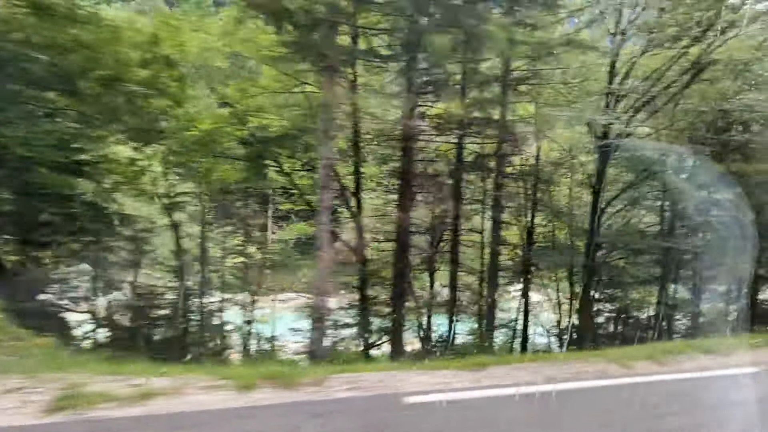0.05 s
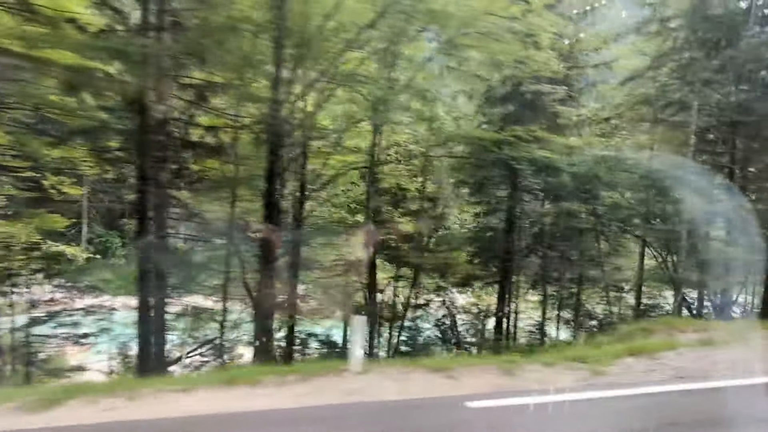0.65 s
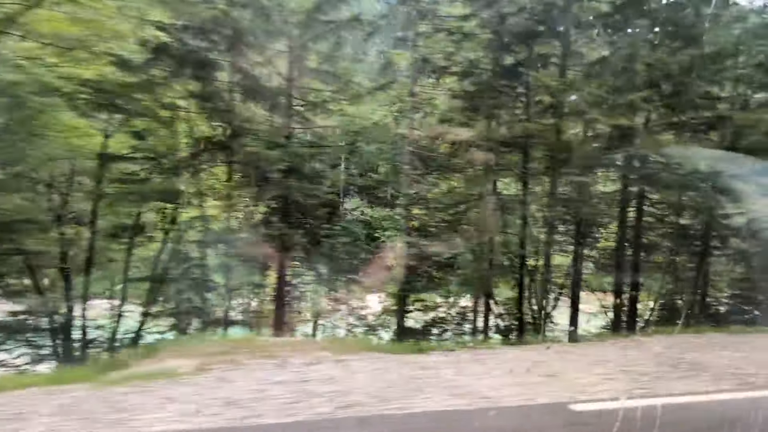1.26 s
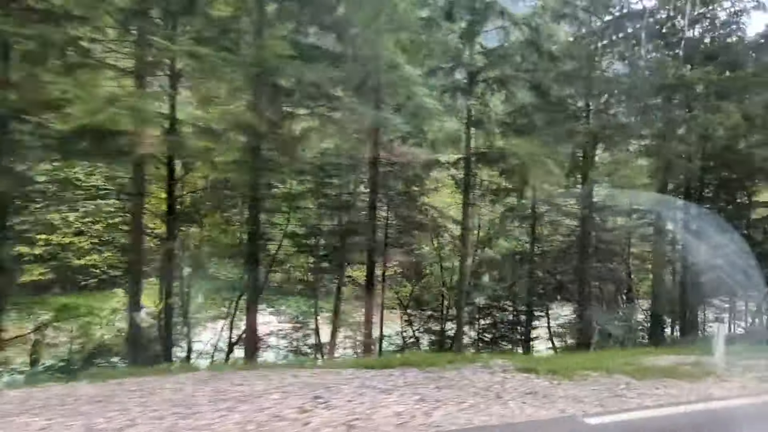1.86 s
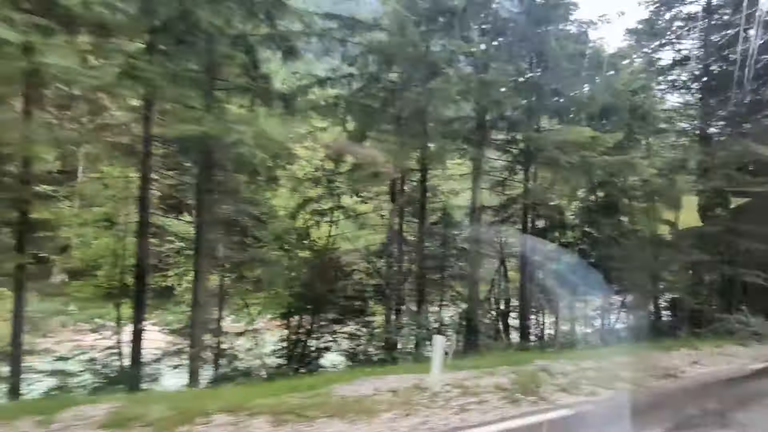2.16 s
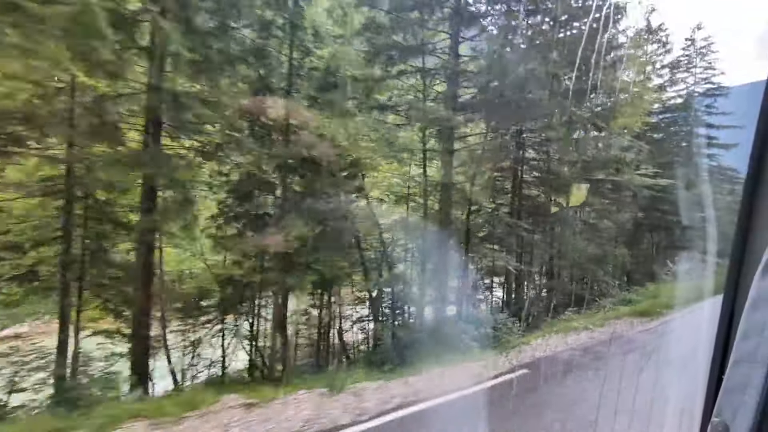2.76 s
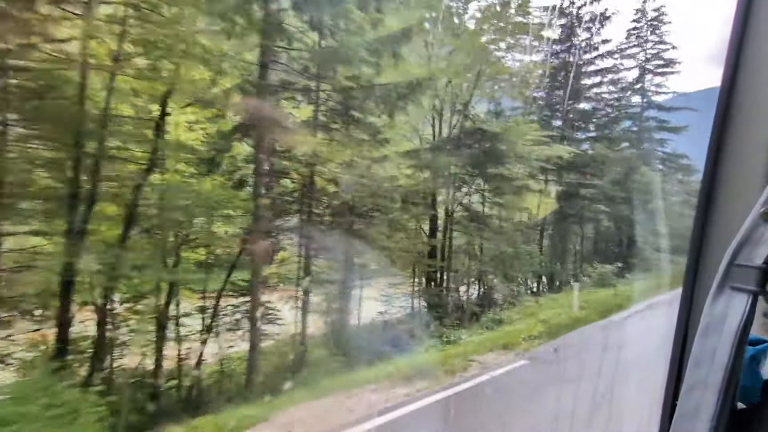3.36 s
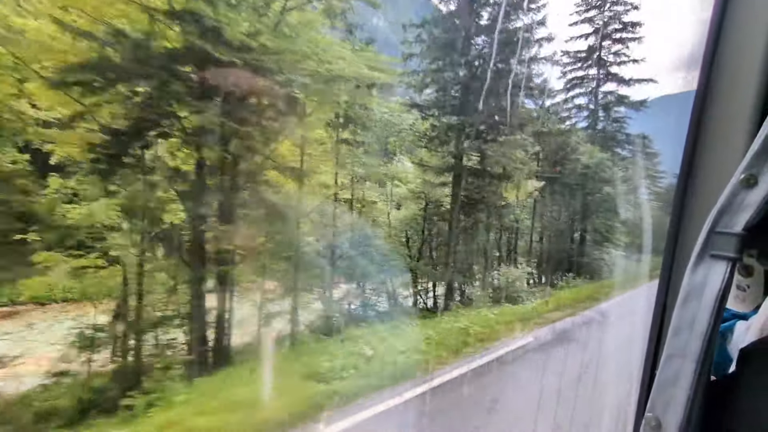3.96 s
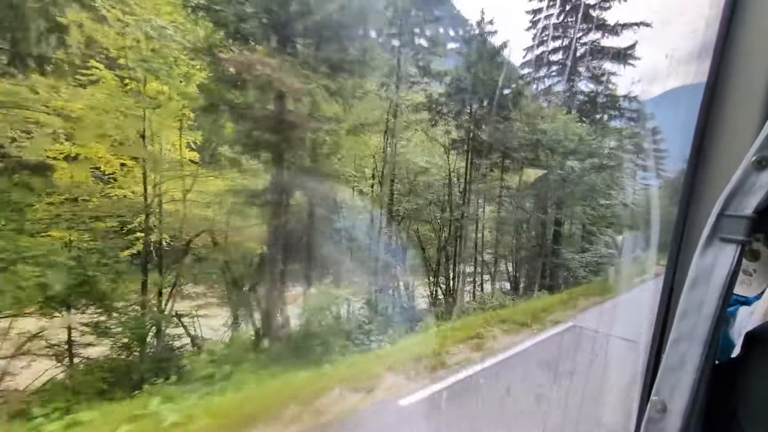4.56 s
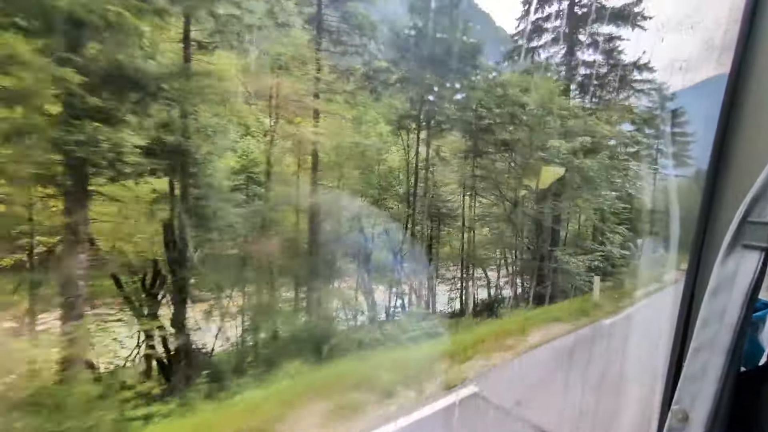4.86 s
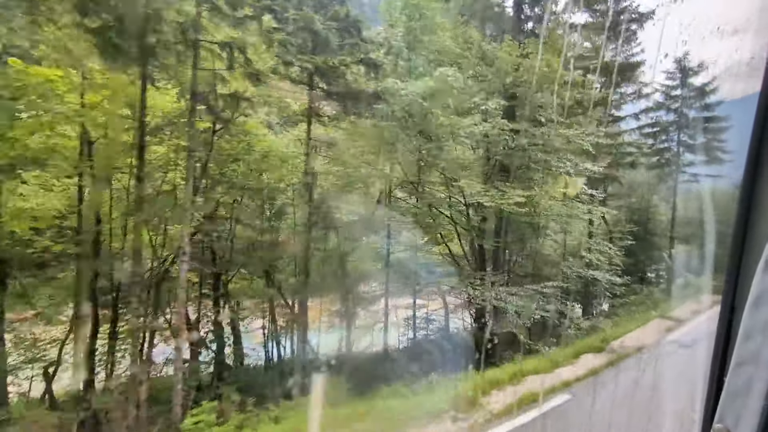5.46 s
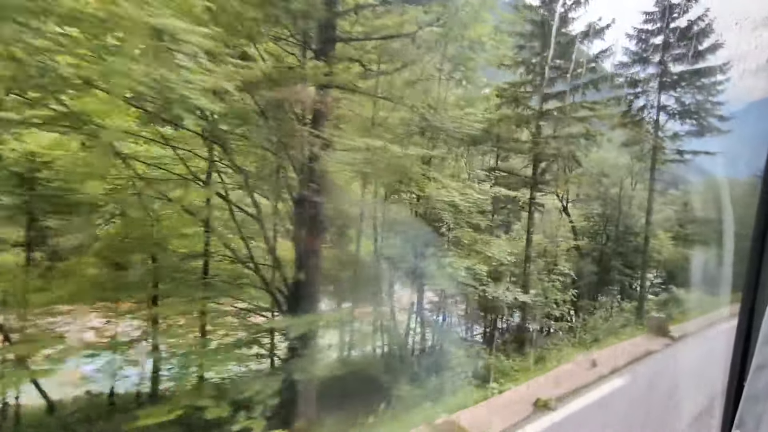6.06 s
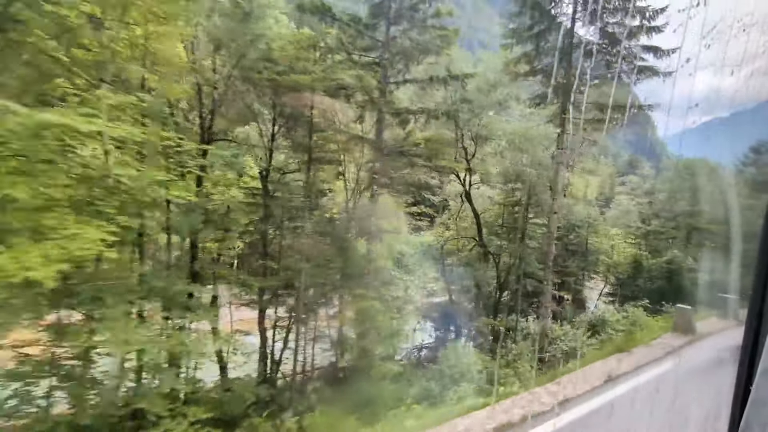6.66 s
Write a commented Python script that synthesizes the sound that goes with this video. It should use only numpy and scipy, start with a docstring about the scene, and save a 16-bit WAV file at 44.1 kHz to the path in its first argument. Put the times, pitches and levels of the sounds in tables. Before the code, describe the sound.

A moving bus rumbles from inside, with engine drone, faint gear whine, soft bumps, fabric rustling and a few trim clacks.

```python
"""Bus on a valley road, window seat

Tyres shake the cabin into a deep rumble. The diesel drones and its gears whine, sagging near the end.
Ventilation hums and hisses; fabric rustles close by. Bumps ring the cabin air, loose trim clacks,
and three faint hoots sound. The tones shift in balance as the microphones turn from window to front."""
import sys
import numpy as np
from scipy import signal
from scipy.fft import rfft, irfft
from scipy.io import wavfile
from scipy.ndimage import uniform_filter1d

SR = 44100
rng = np.random.default_rng(int(sys.argv[2]) if len(sys.argv) > 2 else 0)


def log_audio(samples):
    """Write samples as a 16-bit WAV file to the path given in sys.argv[1]."""
    # one column per channel
    frames = np.atleast_2d(samples).T
    # limit to full scale, then quantise
    limited = np.clip(frames, -1, 1)
    pcm = np.round(limited * 32767).astype(np.int16)
    wavfile.write(sys.argv[1], SR, pcm)


N = 296352
TIME, FREQ = np.arange(N) / SR, np.arange(N // 2 + 1) * SR / N

# noise spectra (frequency [Hz], relative density [dB])
HEAVE_SPECTRUM = [(15, -50), (24, -44), (33, -31), (39, 1), (44, 5), (52, 8.5), (64, -43), (120, -75)]
BOOM_SPECTRUM = [(25, -68), (42, -48), (54, 1), (63, 1.5), (78, 5.5), (94, -4.5), (110, -1.5), (135, -8.5),
                 (180, -17.5), (250, -26.5), (500, -65), (3000, -100)]
TYRE_SPECTRUM = [(30, -43), (80, -17), (200, 13.5), (300, 5.5), (390, 4), (500, 4), (700, -1.5), (820, -3),
                 (950, -6.5), (1250, -7), (1700, -13.5), (2500, -24), (4000, -31.5), (9000, -62)]
AIR_SPECTRUM = [(300, -6), (1500, 11), (2800, 3.5), (4700, -0.5), (6500, -3), (7700, -6), (8600, -34),
                (12000, -15), (15500, -39)]
SLOW_RUB_SPECTRUM = [(700, -19), (2000, 15.5), (3000, 6.5), (4500, 11), (7500, 7), (9000, 0), (11500, 4.5),
                     (13000, -1.5), (15500, -3)]
QUICK_RUB_SPECTRUM = [(1000, -1), (3500, 3), (7000, 2.5), (9000, -3.5), (11500, 0), (14000, -12),
                      (15500, -19)]
CLACK_SPECTRUM = [(300, -50), (800, -22), (1050, -5.5), (1400, 2), (1900, -1.5), (2800, -4), (4500, -6),
                  (6000, -9), (9000, -14.5), (13000, -17), (15500, -30)]
# stereo width (frequency [Hz], side minus mid [dB])
WIDTH = [(60, -50), (110, -13.5), (200, -12), (380, -9), (700, 3.5), (1290, 1.5), (2380, -0.5), (15000, 0)]
# stereo balance (frequency [Hz], left minus right [dB])
BALANCE = [(60, -2), (200, -1), (700, 1), (1290, -3.5), (2380, 0), (4400, -2), (8000, -3), (15000, -1.5)]
# glass, ceiling and seat echoes (left delay [s], right delay [s], gain)
REFLECTIONS = [(.0021, 0.0035, 0.34), (.0057, 0.0045, 0.24), (.0094, 0.0067, 0.22), (0.0151, 0.018, .22),
               (0.025, 0.014, .18)]
# cabin boom from road roughness (time [s], level [dB])
BOOM_LEVEL = [(0, -15), (.2, -15), (.72, -15), (.92, -19), (1.3, -17), (1.65, -22), (2.3, -20),
              (2.7, -18.5), (3.1, -22), (4.1, -22.5), (4.9, -21.5), (5.4, -18), (5.9, -23.5), (6.4, -22.5),
              (6.72, -21.5)]
# tyre roar (time [s], level [dB])
ROAR_LEVEL = [(0, -31), (.6, -33), (1.1, -32), (2, -31), (3, -32), (4, -30.5), (4.9, -32), (5.45, -28),
              (5.8, -30), (6.2, -31.5), (6.72, -32.5)]
# road dips (centre [s], heave level [dB], half length [s])
DIPS = [(.57, -28, 0.094), (.88, -32, 0.043), (1.543, -22, 0.05), (2.931, -22, 0.058), (3.477, -26, 0.088),
        (3.92, -27, 0.05), (5.15, -23, 0.053), (5.475, -17, 0.11), (5.793, -21.5, 0.062),
        (6.113, -25, 0.059), (6.556, -25.5, 0.049)]
# crankshaft (time [s], speed [rev/s])
SHAFT_SPEED = [(0, 19.0), (.6, 18.92), (1.2, 18.93), (1.8, 18.81), (2.4, 18.78), (3, 18.82), (3.5, 18.75),
               (4.1, 18.82), (4.6, 18.72), (5.1, 18.65), (5.5, 18.41), (5.9, 18.2), (6.72, 18.09)]
# microphones turning through the cabin's standing waves (time [s], turn [0 window, 1 front])
TURN = [(0, 0.17), (1.8, 0), (2.4, 0.72), (6.72, 0.69)]
# engine lines (crankshaft order, rounded to halves in use; window level [dB], front level [dB])
ENGINE_ORDERS = [(3, -35, -34.5), (4, -34, -32.5), (6, -30.5, -27.5), (7.5, -35, -35.5), (9, -32.5, -47.5),
                 (12, -36.5, -34), (13.5, -54, -45), (16.5, -49, -45), (18, -47.5, -42.5), (20, -74, -34.5),
                 (27, -52, -40), (29, -51.5, -48.5), (32, -52, -58), (43, -62, -56), (48.14, -60, -57),
                 (73, -67.5, -60), (72, -67, -43.5)]
# gear whine under load (time [s], 24-tooth level [dB], 36-tooth level [dB])
MESH_LEVELS = [(0, -61, -53), (.7, -54, -67), (1.0, -37.5, -43), (1.75, -39.5, -48.5), (2.55, -33.5, -39),
               (3.1, -35.5, -42.5), (3.5, -37, -50.5), (3.8, -41.5, -39.5), (4.35, -39, -38),
               (5.15, -39.5, -42.5), (5.5, -43, -53), (5.8, -37.5, -47), (6.72, -30, -52)]
# blade tones (frequency [Hz], window level [dB], front level [dB])
BLOWER_LINES = [(296.5, -38.5, -48.5), (590.4, -41.5, -51), (809, -49.5, -52)]
# fabric strokes (peak [s], level [dB], half length [s])
STROKES = [(0.113, -52.5, 0.29), (0.269, -41, 0.05), (0.556, -46, 0.046), (0.765, -51, 0.053),
           (.89, -47, 0.09), (1.052, -45, 0.051), (1.198, -49.5, 0.093), (1.305, -45.5, 0.055),
           (1.623, -59, 0.11), (1.825, -49, 0.23), (2.094, -41.5, 0.038), (2.127, -46, 0.19),
           (2.462, -46, 0.13), (2.68, -54, 0.094), (2.83, -46, 0.063), (2.95, -47.5, 0.056),
           (3.09, -49, 0.18), (3.223, -50, 0.019), (3.286, -49.5, .008), (3.41, -50.5, 0.032),
           (3.533, -56, 0.067), (3.655, -52.5, 0.05), (4.004, -55.5, 0.27), (4.3, -44.5, 0.034),
           (4.38, -51, 0.074), (4.74, -52.5, 0.2), (5.002, -59, 0.12), (5.16, -50, 0.053),
           (5.33, -56, 0.06), (5.546, -55, 0.026), (6.234, -52, 0.33), (6.623, -46, 0.062)]
# dull scrape (peak [s], level [dB], half length [s], centre [Hz])
SCRAPE = (3.1, -50, .09, 2500)
# road bumps (time [s], level [dB], cabin ring [Hz])
JOLTS = [(0.163, -9.5, 74.6), (0.236, -3.5, 81.6), (0.566, -23, 60), (2.0, -12, 81.5), (2.753, -8.5, 71),
         (2.89, -17, 69.6), (3.7, -12, 69.7), (4.219, -13, 69.6), (4.491, -9.5, 72.5), (5.072, -5.5, 69),
         (5.329, -8, 75), (6.051, -12, 70.7), (6.421, -8, 74.7)]
# loose trim modes (frequency [Hz], width [Hz], gain [dB])
TRIM_MODES = [(1026, 92, 19), (1616, 36.6, 13), (1890, 28, 14.5), (2140, 36, -14), (3930, 73, -1.5),
              (4440, 64, 6), (5570, 19, 4)]
# trim impacts (time [s], level [dB], tilt [dB/octave], contact snap [Hz])
CLACKS = [(0.592, -26, 0, 4760), (0.5965, -16, 0.9, 4830), (0.603, -28.5, 6.5, 3000), (1.03, -30, -1, 4570),
          (2.207, -32, 3, 3670), (4.763, -42, 0.5, 4500), (4.8696, -23, 2, 3400), (5.321, -40.5, -2, 4510),
          (6.411, -35.5, 4, 3400)]
# hoots (peak [s], pitch [Hz], level [dB], half length [s])
HOOTS = [(1.208, 630, -32, 0.086), (1.574, 610, -40, 0.06), (2.348, 518, -38.5, 0.12)]


def undb(db):
    """Decibels to gain."""
    return 10 ** (np.asarray(db) / 20)


def curves(table):
    """Columns of a timed table, per sample."""
    s, *columns = np.transpose(table)
    return [np.interp(TIME, s, column) for column in columns]


def colour(points):
    """Gain per frequency bin from (Hz, dB) points."""
    hz, db = np.transpose(points)
    return undb(np.interp(np.log(FREQ + 1), np.log(hz), db))


def unit(x):
    """Divide by the root of the mean square."""
    return x / np.sqrt(np.mean(x ** 2))


def walk(rate_hz):
    """Random wander below rate_hz, rms 1."""
    return unit(irfft(rfft(rng.standard_normal(N)) / (1 + (FREQ / rate_hz) ** 4), N))


def swell(peak_s, half_s):
    """Gaussian rise and fall."""
    return np.exp(-((TIME - peak_s) / half_s) ** 2)


def decay(age_s, t60_s):
    """Exponential fall, 60 dB in t60_s."""
    return np.exp(-np.log(1000) * age_s / t60_s)


def resonance(hz, width_hz):
    """Response of one mode, gain 1 at centre."""
    return 1j * FREQ * width_hz / (hz ** 2 - FREQ ** 2 + 1j * FREQ * width_hz)


def cabin_noise(gain):
    """Diffuse stereo noise: bass alike on both sides, treble unrelated."""
    mid, side = rfft(rng.standard_normal((2, N)))
    side = side * colour(WIDTH)
    lean = np.sqrt(colour(BALANCE))
    return unit(irfft(gain * np.array([(mid + side) * lean, (mid - side) / lean]), N))


def steady_noise(spectrum, window_s):
    """Cabin noise with slow swells evened out."""
    noise = cabin_noise(colour(spectrum))
    power = uniform_filter1d(np.mean(noise ** 2, axis=0), int(window_s * SR))
    return noise / np.sqrt(power + 1e-6)


def near_noise(spectrum):
    """Cabin noise comb-filtered by close surfaces."""
    comb = 1 + sum(gain * np.exp(-2j * np.pi * np.outer([left_s, right_s], FREQ))
                   for left_s, right_s, gain in REFLECTIONS)
    return unit(irfft(rfft(cabin_noise(colour(spectrum))) * comb, N))


def tone(hz, waver_db, smear_rad, lead_s=0.00026):
    """A line wavering as the cabin sways; left channel leads."""
    phase = 2 * np.pi * np.cumsum(hz + np.zeros(N)) / SR + smear_rad * walk(6.9)
    pair = np.array([np.sin(phase + 2 * np.pi * hz * lead_s), np.sin(phase)])
    return unit(undb(waver_db * walk(2.4)) * pair)


def road(heave_re_boom_db=-21, heave_wander_db=5.5):
    """The surface booms in the cabin and roars under the tyres; the body heaves, most in dips."""
    boom_db, = curves(BOOM_LEVEL)
    roar_db, = curves(ROAR_LEVEL)
    sway = undb(boom_db + heave_re_boom_db + heave_wander_db * walk(5.1))
    dips = sum(undb(db) * swell(s, half_s) for s, db, half_s in DIPS)
    heave = (sway + dips) * steady_noise(HEAVE_SPECTRUM, window_s=0.085)
    boom = undb(boom_db) * steady_noise(BOOM_SPECTRUM, window_s=0.12)
    roar = undb(roar_db + 0.75 * walk(14.5)) * cabin_noise(colour(TYRE_SPECTRUM))
    return heave + boom + roar


def engine(shaft_hz, turn):
    """Diesel drone on whole and half orders; six cylinders fire on multiples of 3."""
    out = 0
    for order, window_db, front_db in ENGINE_ORDERS:
        line = tone(shaft_hz * np.round(2 * order) / 2, waver_db=2, smear_rad=0.33)
        out += undb(window_db + turn * (front_db - window_db)) * line
    return out


def driveline(shaft_hz, flutter_db=-12):
    """Two gear meshes whine, the lower throbbing; a belt-driven unit sings thinly above."""
    low_db, high_db = curves(MESH_LEVELS)
    low_hz, high_hz, belt_hz = 24 * shaft_hz, 36 * shaft_hz, 65.22 * shaft_hz
    beat_hz = 0.32 * shaft_hz
    mesh = tone(low_hz, waver_db=4.5, smear_rad=0.41)
    sideband = undb(-4) * tone(low_hz - beat_hz, waver_db=2.5, smear_rad=1.0)
    low = undb(low_db) * unit(mesh + sideband)
    high = undb(high_db) * tone(high_hz, waver_db=0.5, smear_rad=0.091, lead_s=0.0002)
    belt = undb([[-46.5], [-43.5]]) * tone(belt_hz, waver_db=2, smear_rad=0.4, lead_s=0.00034)
    flutter = 1 + undb(flutter_db) * walk(18)  # road shake varies the tooth load
    return (low + high) * flutter + belt


def blower(turn, hiss_db=-49):
    """Ventilation: blade tones and smooth air hiss."""
    hum = sum(undb(window_db + turn * (front_db - window_db)) * tone(hz, waver_db=2, smear_rad=1.13)
              for hz, window_db, front_db in BLOWER_LINES)
    return hum + undb(hiss_db) * near_noise(AIR_SPECTRUM)


def rustle(creep_db=-60.5, quick_s=0.065, crisp_db=-40.5, grain_db=1.13):
    """Fabric creeps and slides as the bus sways: bright when quick, crisp when hard; one dull scrape."""
    slow_power = undb(creep_db - 2.5 * walk(6.5)) ** 2
    quick_power = 0
    for s, db, half_s in STROKES:
        power = (undb(db) * swell(s, half_s)) ** 2
        quick_share = 1 / (1 + (half_s / quick_s) ** 4)
        slow_power += (1 - quick_share) * power
        quick_power += quick_share * power
    sliding = np.sqrt(slow_power) * near_noise(SLOW_RUB_SPECTRUM)
    brushing = np.sqrt(quick_power) * near_noise(QUICK_RUB_SPECTRUM)
    hardness = (quick_power / quick_power.max()) ** 2
    crisp = undb(crisp_db) * hardness * cabin_noise(resonance(hz=12000, width_hz=9000) ** 2)
    s, db, half_s, hz = SCRAPE
    scrape = undb(db) * swell(s, half_s) * cabin_noise(resonance(hz, width_hz=1320) ** 2)
    return (sliding + brushing + crisp + scrape) * undb(grain_db * walk(33))


def jolts(rise_s=0.0034, t60_s=0.26):
    """Each bump rings the cabin's lowest air resonance for a few cycles."""
    out = 0
    for s, db, hz in JOLTS:
        age_s = np.maximum(TIME - s, 0)
        envelope = (1 - np.exp(-age_s / rise_s)) * decay(age_s, t60_s)
        out += undb(db) * envelope * np.sin(2 * np.pi * hz * age_s)
    return out * undb([[0.8], [-0.8]])


def clacks(rise_s=0.0006, tail_db=-20, snap_db=3, grit_db=3):
    """Trim hits its frame: a gritty burst rings its modes and dies quickly among the seats."""
    modes = sum(undb(db) * resonance(hz, width_hz) for hz, width_hz, db in TRIM_MODES)
    chatter = unit(rng.standard_normal((2, N)) * undb(grit_db * walk(1500)))
    spectrum = 0
    for s, db, tilt_db_per_octave, snap_hz in CLACKS:
        age_s = np.maximum(TIME - s, 0)
        fade = decay(age_s, t60_s=0.07) + undb(tail_db) * decay(age_s, t60_s=0.32)
        burst = chatter * (1 - np.exp(-age_s / rise_s)) * fade
        snap = undb(snap_db) * resonance(snap_hz, width_hz=400)
        body = colour(CLACK_SPECTRUM) * (1 + modes + snap)
        tilt = undb(tilt_db_per_octave * np.log2(FREQ + 1))
        spectrum += undb(db) * rfft(burst) * unit(body * tilt)
    return irfft(spectrum, N) * undb([[-3], [0]])


def hoots():
    """Short soft hoots somewhere in the cabin."""
    return sum(undb(db) * swell(s, half_s) * tone(hz, waver_db=6.5, smear_rad=0.35)
               for s, hz, db, half_s in HOOTS)


def scene():
    """Stereo sum at the seat."""
    shaft_hz, = curves(SHAFT_SPEED)
    turn, = curves(TURN)
    running = road() + engine(shaft_hz, turn) + driveline(shaft_hz) + blower(turn)
    return running + rustle() + jolts() + clacks() + hoots()


def record(dry):
    """Low cut, soft peak limit, high cut."""
    low_cut_hz, ceiling, high_cut_hz = 33, 0.85, 15550
    sound = signal.sosfilt(signal.butter(6, low_cut_hz, "highpass", fs=SR, output="sos"), dry)
    sound = sound / (1 + (sound / ceiling) ** 6) ** (1 / 6)
    return signal.sosfilt(signal.ellip(10, 0.2, 80, high_cut_hz, fs=SR, output="sos"), sound)


dry = scene()
out = record(dry)
log_audio(out)
```